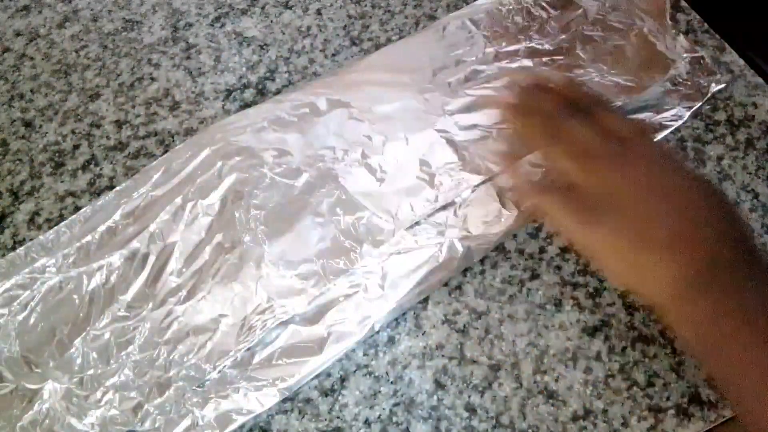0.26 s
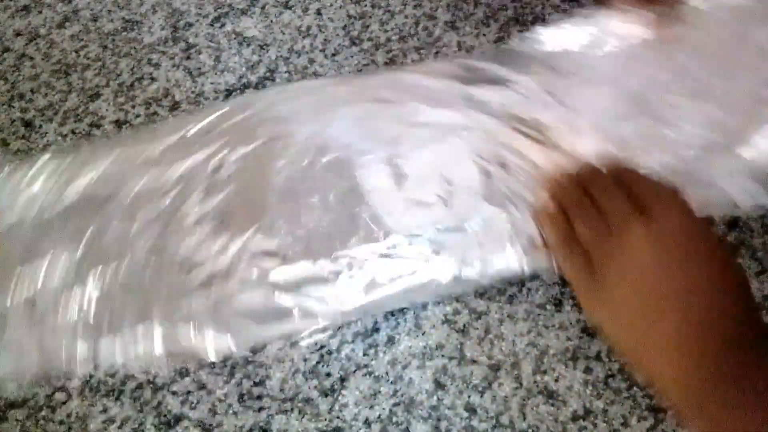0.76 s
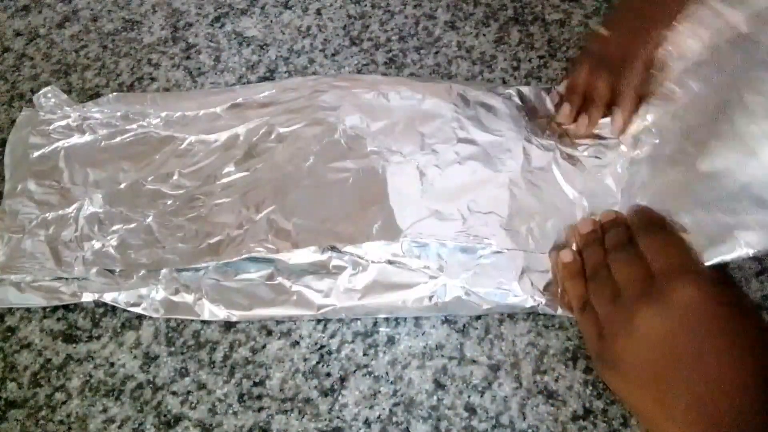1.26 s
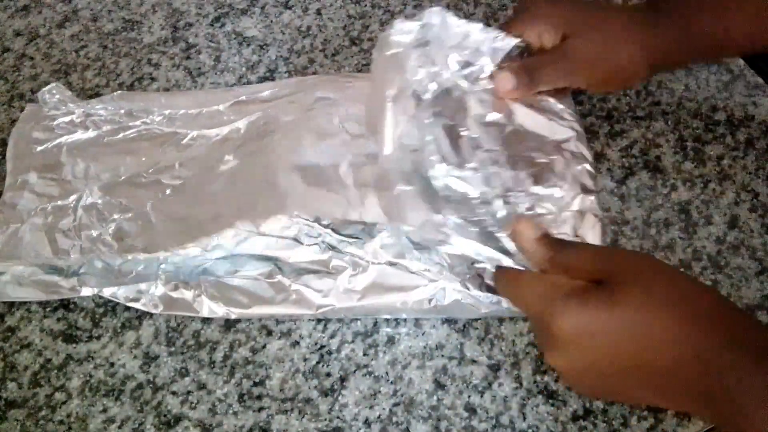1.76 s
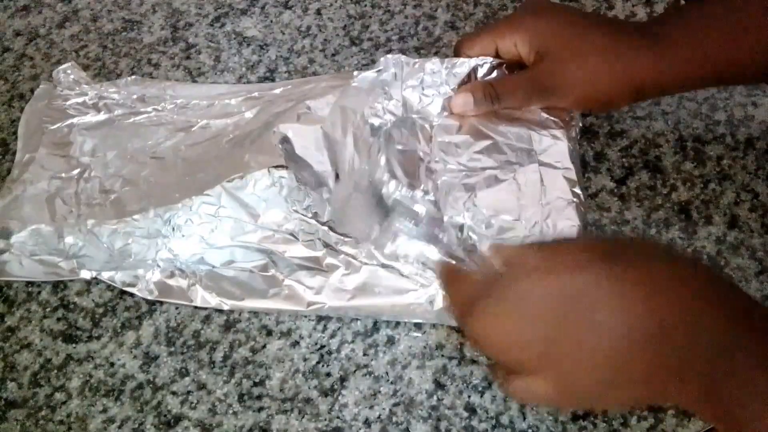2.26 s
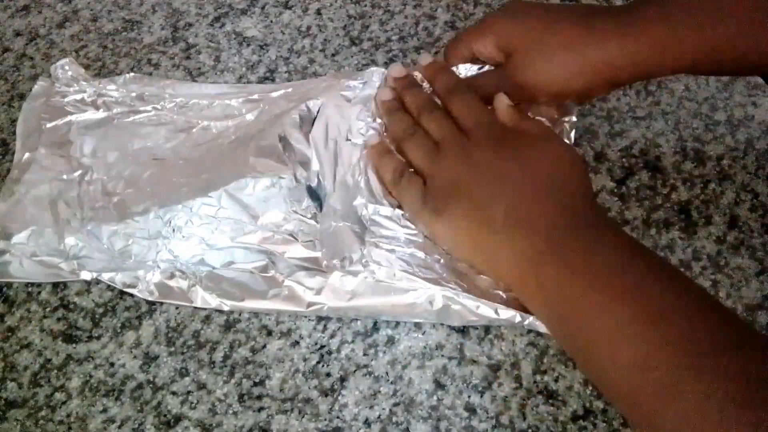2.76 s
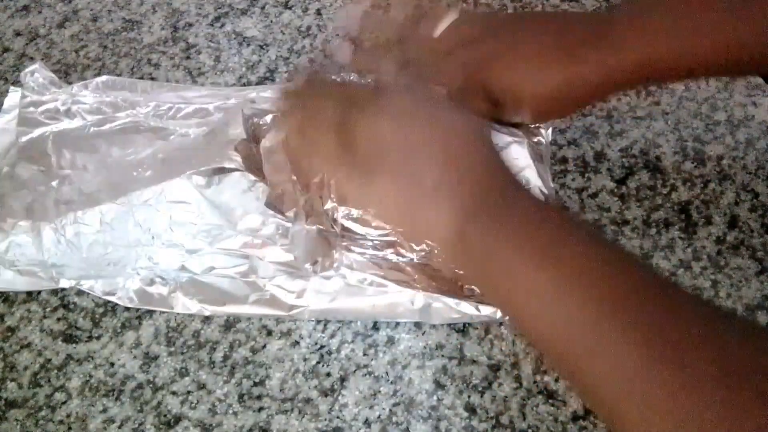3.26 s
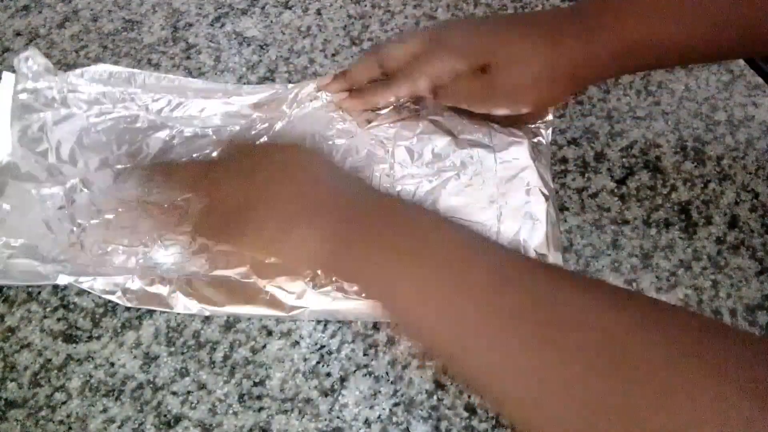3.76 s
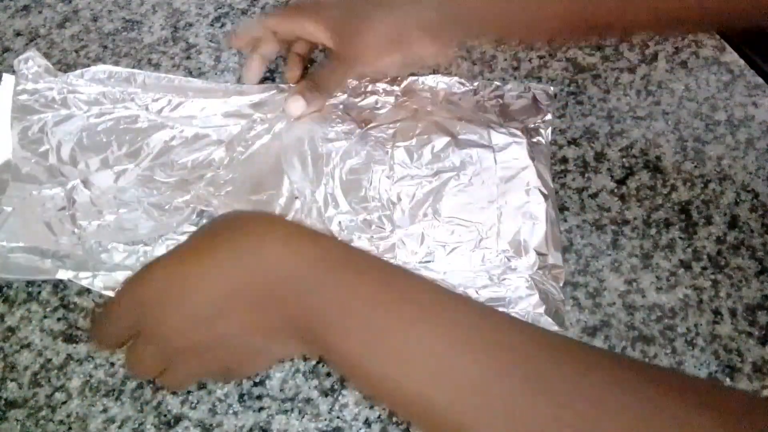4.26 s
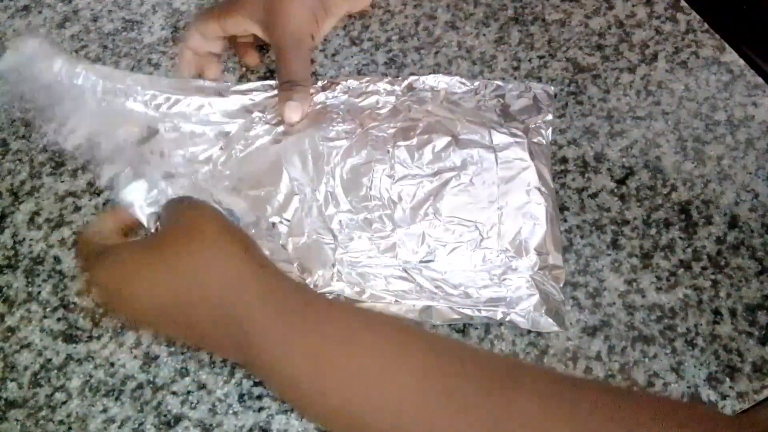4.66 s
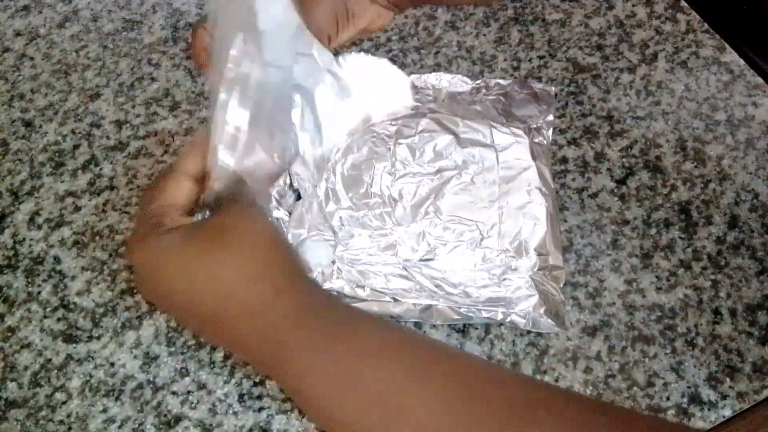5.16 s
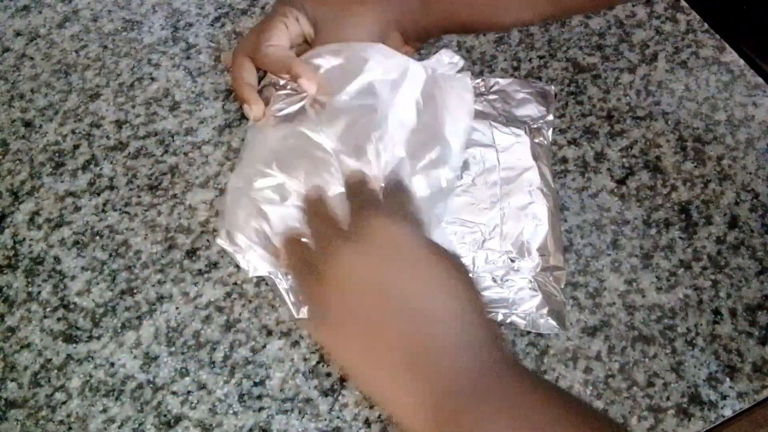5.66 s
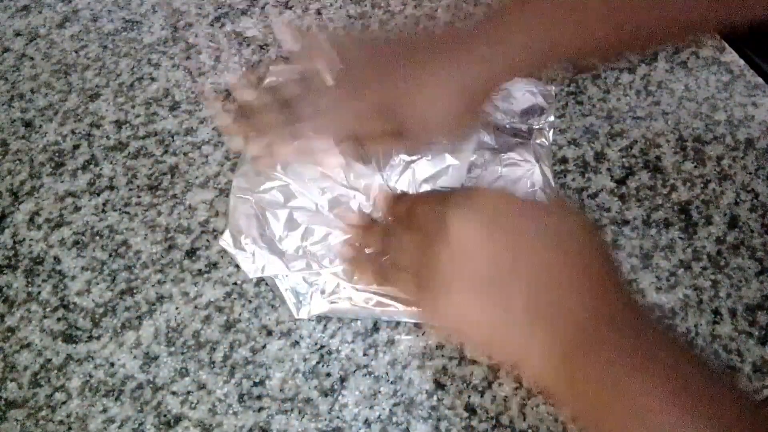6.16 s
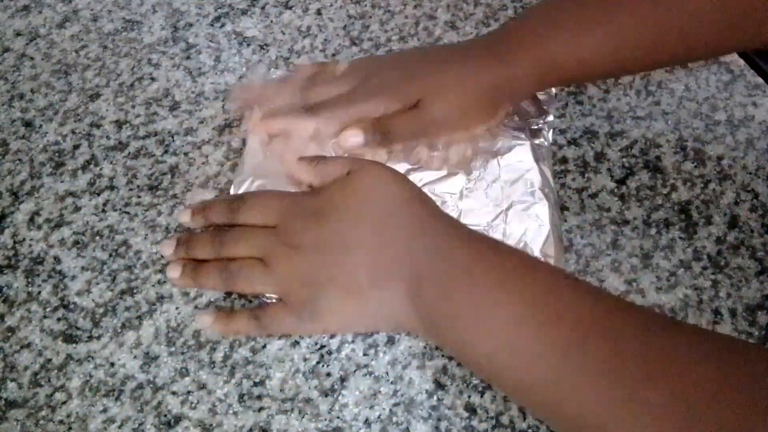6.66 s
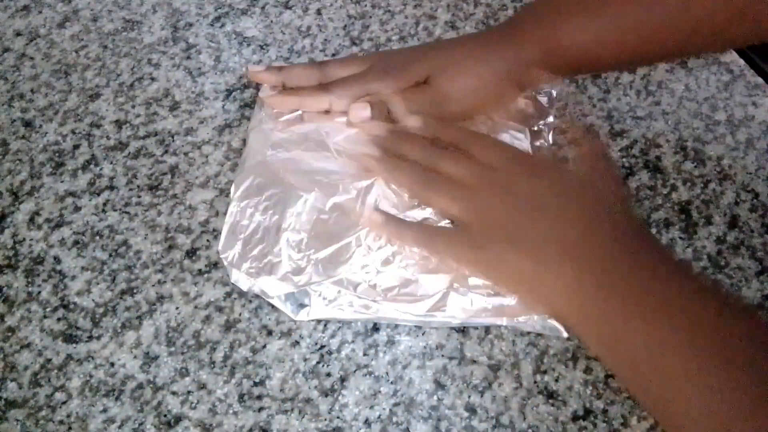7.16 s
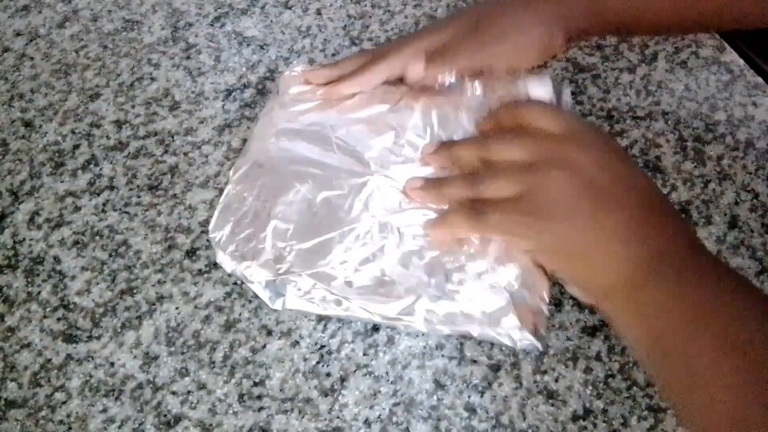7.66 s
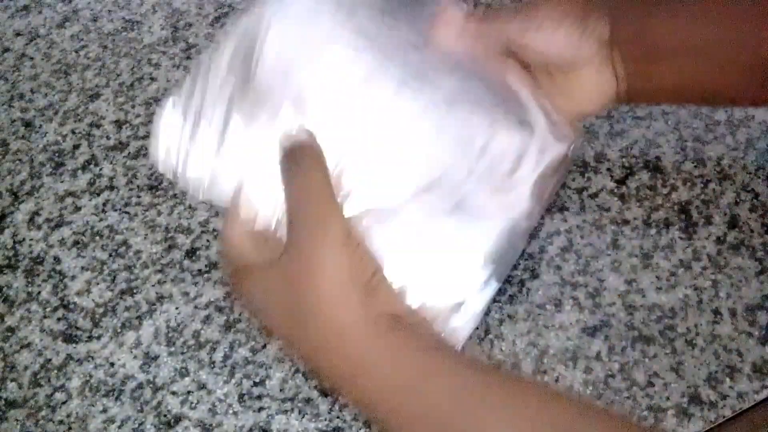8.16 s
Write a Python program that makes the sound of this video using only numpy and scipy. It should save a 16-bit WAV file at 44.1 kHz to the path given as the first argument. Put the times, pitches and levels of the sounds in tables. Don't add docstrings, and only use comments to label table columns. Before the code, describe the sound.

A close microphone in a quiet, hard-walled kitchen catches thin foil and plastic film crackling on a stone worktop, bright and sizzling with almost no bass. It opens at once with a loud crunch and palm pat, then bursts at 0.5 and 0.7 s. Around 1.1 s there are scattered ticks, then a strong fold swells near 1.35 s and a fuller, lower crunch comes at 1.8 s. Gentler crinkling follows to 2.7 s, then sharp strokes at 2.8-3.8 s with small hollow knocks. Sparse crackles at 4-4.6 s build to busy rustling and flapping from 4.8 to 5.8 s. About 6 s it thins to ticks, then snappy pressing at 6.3-6.7 s. Firm pats at 7.0 and 7.3 s thump the slab with a soft low hum. Rustling strokes continue, ending in dense crisp snaps from 8.2 to 8.4 s.

```python
import sys
import numpy as np
from scipy import signal
from scipy.fft import rfft, irfft
from scipy.io import wavfile
from scipy.ndimage import uniform_filter1d, minimum_filter1d

SR = 44100
rng = np.random.default_rng(int(sys.argv[2]) if len(sys.argv) > 2 else 0)


def voltage_ratio(decibels):
    exponent = np.asarray(decibels, float) / 20
    return 10 ** exponent


def transcribe(signal):
    frames = np.atleast_2d(signal).T
    limited = np.clip(frames, -1, 1)
    pcm = np.round(limited * 32767).astype(np.int16)
    wavfile.write(sys.argv[1], SR, pcm)


N = 371322


def unit(x):
    return x / np.sqrt(np.mean(x ** 2))


def colour(x, points):
    hz, db = np.transpose(points)
    size = 4096
    grid = np.maximum(np.arange(size // 2 + 1) * SR / size, 1)
    gain_db = np.interp(np.log(grid), np.log(hz), db)
    cepstrum = irfft(np.log(voltage_ratio(gain_db)))
    cepstrum[1:size // 2] *= 2
    cepstrum[size // 2 + 1:] = 0
    return signal.fftconvolve(x, irfft(np.exp(rfft(cepstrum))))[:N]


def fade(t60, length):
    return np.exp(-np.log(1000) * np.arange(length) / (max(t60, .004) * SR))


def scatter(rate, spread_db):
    when, size = rng.random(N), rng.exponential(size=N)
    return (when < rate / SR) * voltage_ratio(spread_db * np.minimum(size, 3))


# (frequency [Hz], level [dB per Hz])
HUSH = [(20, -33), (60, -8), (150, -2), (480, 3.5), (1400, -11), (2200, 4), (6500, -4), (8200, -9),
        (15800, -18)]


def kitchen_hush():
    return unit(colour(rng.standard_normal(N), HUSH)) * voltage_ratio(-49.5)


# (time of peak [s], effort [dB], build-up [s], let-go [s])
BENDS = [(.118, -12.5, 0.098, 0.13), (.676, -13, 0.12, 0.33), (.9, -16, 0.88, 0.26),
         (1.348, -10, 0.19, 0.18), (1.6, -18.5, 0.9, 0.11), (1.736, -18.5, 0.072, .1), (2.18, -17, 1, 0.12),
         (2.357, -25, 0.065, 0.05), (2.594, -19.5, .12, 0.66), (2.943, -13.5, 0.076, 0.18),
         (3.185, -17, 0.67, 0.14), (3.299, -12, 0.088, .1), (3.44, -21.5, 0.1, 0.079),
         (3.799, -16, .4, 0.16), (4.101, -18.5, 0.16, 0.23), (4.56, -20.5, 0.16, 1), (4.8, -17.5, 0.7, 1),
         (4.923, -14, 0.12, 0.18), (5.123, -16.5, 0.24, 0.21), (5.272, -15, .13, 0.12),
         (5.404, -13, 0.1, .35), (5.619, -16.5, 0.1, 0.16), (5.773, -12, 0.18, 0.2),
         (5.923, -23.5, 0.25, 0.42), (6.878, -23, 1, 0.1), (7.188, -22, 0.25, 0.059),
         (7.565, -19, 0.15, 0.2), (7.788, -16, 0.25, 0.11), (8.012, -17.5, 0.71, 0.12),
         (8.41, -14.5, 0.36, .3)]
# (time [s], effort [dB], build-up [s], let-go [s], extra push on large panels [dB])
PRESSES = [(.018, -25.5, 0.083, 0.055, -3), (.046, -9.5, 0.0069, 0.059, 1), (.348, -24, 0.026, 0.036, -3),
           (0.506, -11.5, 0.053, 0.13, -3.5), (1.2, -24, 0.0063, .2, -12), (1.83, -18, 0.015, 1, 0.5),
           (2.76, -11.5, 0.038, 0.15, -0.2), (3.602, -14, 0.044, 0.37, 2.5), (4.02, -16, 0.021, 0.24, 3),
           (4.37, -21, .015, .13, 1), (5.225, -27, .02, 0.055, 2), (6.297, -13, 0.051, 0.068, 0.5),
           (6.531, -15, 0.056, 0.55, 1.5), (7.028, -8, 0.0086, 0.077, 2.5), (7.28, -14.5, 0.013, 0.12, 3),
           (8.25, -24, 0.045, 0.35, 1)]
# (time [s], slackness [dB])
SLACK = [(0, -1), (1.3, -1.5), (1.7, 4), (2.2, -0.9), (2.5, -0.7), (3.1, 0.7), (3.7, -0.8), (4.3, -0.1),
         (4.6, -1.5), (4.9, -3.5), (5.3, -2.7), (5.8, -3), (6.3, 0.1), (6.62, -6.5), (6.8, -1.3),
         (7.3, 0.5), (7.9, 0.3), (8.42, 0.5)]


def handling():
    t = np.arange(0, N + 32, 32) / SR
    rest_db, stroke_bend = -48, 1.138
    lift_db, lift_s, land_s = -5, 0.041, 1.5

    def stroke_power(s, db, build, let_go):
        away = np.where(t < s, (s - t) / max(build, .003), (t - s) / max(let_go, .003))
        return voltage_ratio(db - 20 * away ** stroke_bend) ** 2

    lift = sum(np.exp(-((t - s + land_s * build) / lift_s) ** 2) for s, _, build, *_ in PRESSES)
    bending = voltage_ratio(rest_db) ** 2 + sum(stroke_power(*row) for row in BENDS)
    power = push = bending * voltage_ratio(lift_db * lift) ** 2
    for *row, extra_db in PRESSES:
        press = stroke_power(*row) * voltage_ratio(lift_db * lift * (t > row[0])) ** 2
        power = power + press
        push = push + press * voltage_ratio(extra_db) ** 2

    facet_db = 10 * np.log10(power)
    slack_db = np.interp(t, *np.transpose(SLACK))
    fold_db = -12 - 0.088 * (facet_db + 15.5) + slack_db
    panel_db = -40 + 0.85 * (facet_db + 19.5) + 10 * np.log10(push / power) + 0.2 * slack_db
    return (np.interp(np.arange(N) / SR, t, db) for db in (facet_db, fold_db, panel_db, slack_db))


def avalanches(rate, spread_db, t60):
    swells = signal.lfilter([1], [1, -fade(t60, 2)[1]], scatter(rate, spread_db))
    return swells / np.sqrt(uniform_filter1d(swells ** 2, SR // 12) + 1e-6)


# (frequency [Hz], level [dB per Hz])
FOIL_COLOUR = [(71, -68), (120, -41), (272, -30.5), (533, -21.5), (963, -19.5), (1090, -16), (1210, -16.5),
               (1360, -16), (2140, -20), (3560, -13), (5350, -13), (8390, 0.5), (11200, -10.5),
               (14900, -15), (15800, -13.5)]


def through_port(x):
    return colour(x, FOIL_COLOUR)


def pops(db):
    step = fade(0.0067, 2)[1]
    flips = scatter(130, 2.9)
    shudder = signal.lfilter([1], [1, -2 * step, step ** 2], flips) * rng.standard_normal(N)
    ring = signal.iirpeak(8320, 4.1, fs=SR)

    def heard(x):
        return through_port(signal.lfilter(*ring, x) + 0.44 * x)

    return heard(shudder * voltage_ratio(db)) / np.std(heard(shudder))


# (time [s], peak level [dB])
CRUNCHES = [(.044, -7), (.9419, -17), (1.4512, -12.5), (1.608, -18), (1.6612, -14), (1.8037, -7),
            (2.4422, -15.5), (2.473, -15), (2.5106, -15.5), (2.5765, -12.5), (2.634, -15), (2.6517, -14.5),
            (3.576, -12), (4.009, -12), (4.177, -13.5), (4.2452, -13.5), (4.361, -11.5), (4.9059, -14),
            (5.9862, -11.5), (6.682, -13.5), (6.7074, -10), (6.8246, -16), (7.0262, -8.5), (7.3504, -20),
            (7.2745, -10.5), (7.289, -10), (7.6794, -15), (7.916, -12), (8.2466, -12), (8.291, -12.5)]
# (time [s], peak level [dB])
TICKS = [(.3383, -11.5), (.4398, -22), (6.0375, -15), (1.0703, -25), (1.0863, -10), (1.12, -10.5),
         (1.1475, -15.5), (1.1947, -15.5), (1.7096, -12), (2.2776, -20), (2.293, -15.5), (2.3377, -14.5),
         (2.3914, -14.5), (2.4055, -15), (3.5084, -16), (3.9163, -16), (3.981, -14), (4.2117, -14),
         (4.291, -17), (4.46, -16.5), (5.931, -13), (6.027, -14), (6.0912, -16.5), (6.108, -16),
         (6.192, -14), (6.2335, -17.5), (6.0785, -18.5), (8.1313, -13.5), (8.1828, -16), (8.157, -15.5)]
# (time [s], peak level [dB])
SNAPS = [(.478, -12), (.566, -10), (.9143, -14.5), (1.6394, -12), (1.8493, -9.5), (2.7286, -10),
         (2.824, -12.5), (3.0365, -11.5), (3.169, -11), (3.3653, -11.5), (4.115, -13), (4.524, -11),
         (4.5723, -14), (4.6855, -12), (4.9657, -16), (5.219, -11), (5.255, -11), (5.614, -10),
         (5.6295, -14), (6.275, -9.5), (6.505, -15.5), (6.5295, -9), (6.605, -10.5), (6.6515, -11),
         (6.6655, -9), (8.2172, -7), (8.2717, -8.5), (8.2816, -7), (8.3054, -12.5), (8.3622, -10)]


def crack_activity(share_db, folds):
    activity, t = np.zeros(N + SR), np.arange(SR // 8) / SR

    def add(cracks, fold_db, run_s, build_s):
        for s, db in cracks:
            start, run = int(s * SR), run_s * voltage_ratio(1.25 * (db + 10))
            shape = np.exp(-t / run) * np.minimum(t / build_s, 1)
            activity[start:start + len(t)] += voltage_ratio(db + share_db + folds * fold_db) * shape

    add(CRUNCHES, fold_db=-10, run_s=0.0057, build_s=0.0016)
    add(TICKS, fold_db=-17, run_s=0.0053, build_s=0.0014)
    add(SNAPS, fold_db=-20, run_s=0.0066, build_s=0.0023)
    return activity[:N]


CREASES = {"facet": (5500, 19000, 6500, 0.27, 1.36), "fold": (2100, 5500, 5000, 0.39, 0.45),
           "panel": (150, 2102, 1488, .5, -22)}


def foil():
    facet_db, fold_db, panel_db, slack_db = handling()
    effort = {"facet": voltage_ratio(facet_db), "fold": voltage_ratio(facet_db + fold_db), "panel": voltage_ratio(panel_db)}
    shared = .4 * avalanches(120, 2.8, 0.28) + 0.27 * avalanches(500, 3.1, 0.016)
    gaps = (shared / 0.76) ** np.clip(0.031 * (-15 - facet_db), 0, 2)
    stutter = 0.63 + .5 * avalanches(600, 7.8, 0.013)
    rings_an_octave = 2.5
    narrowing, dimming = 0.98, .15
    out = 0
    for size, (lo_hz, hi_hz, rate, unrest, share_db) in CREASES.items():
        cracks = crack_activity(share_db, folds=size == "fold")
        bands = round(rings_an_octave * np.log2(hi_hz / lo_hz))
        edges = np.geomspace(lo_hz, hi_hz, bands + 1)
        steady, handled = 0, 0
        for band in zip(edges, edges[1:]):
            ring = signal.butter(2, band, "band", fs=SR, output="sos")
            clicks = scatter(rate, 2.77) * np.sign(rng.standard_normal(N))
            swells = shared + unrest * avalanches(120, 3.8, 0.049)
            activity = effort[size] * gaps * swells + cracks * stutter
            if size == "facet":
                off = np.log2(np.sqrt(band[0] * band[1]) / 8300)
                tilt_db = narrowing * slack_db * abs(off) + dimming * (facet_db + 18) * max(off, 0)
                activity = activity * voltage_ratio(tilt_db)
            steady = steady + signal.sosfilt(ring, clicks)
            handled = handled + signal.sosfilt(ring, clicks * activity)
        out = out + through_port(handled) / np.std(through_port(steady))
    return out + pops(facet_db - 7 - 0.71 * slack_db)


# (time [s], peak level [dB], ring [Hz])
KNOCKS = [(.0427, -18.5, 1270), (.5036, -31, 990), (.6552, -26, 1610), (.8085, -25, 1460),
          (5.272, -30.5, 620), (1.851, -34, 1090), (2.1866, -30, 1300), (2.9277, -31, 1050),
          (3.1652, -30, 1630), (3.299, -22, 1340), (3.5715, -28.5, 1350), (3.618, -25.5, 1370),
          (3.6696, -26, 670), (4.0085, -24.5, 1070), (4.1133, -24.5, 1360), (5.6607, -26.5, 1370),
          (4.8323, -27.5, 1340), (5.6047, -30, 1370), (5.772, -21.5, 1370), (5.8367, -25.5, 1480),
          (6.2759, -30, 1050), (6.525, -29, 1100), (7.0235, -19, 890), (7.2867, -22, 1010),
          (7.3067, -27, 1380), (7.3493, -32, 1344), (7.5266, -27.5, 1430), (7.6157, -27.5, 1600),
          (7.6836, -21, 1420), (7.9507, -29, 810)]


def knocks():
    t, out = np.arange(SR // 10) / SR, np.zeros(N + SR)
    modes = ((1.02, 1), (0.657, 0.18), (1.23, 0.33))
    for s, db, hz in KNOCKS:
        ring = sum(gain * np.sin(2 * np.pi * hz * ratio * t) for ratio, gain in modes) * fade(0.017, len(t))
        onset = np.minimum(t / 0.0011, 1) ** 3
        jolts = rng.standard_normal(len(t)) ** 3 * fade(0.022, len(t)) * onset
        pop = signal.fftconvolve(ring, jolts)[:len(t)]
        start = int(s * SR)
        out[start:start + len(t)] += voltage_ratio(db + 7.0) * pop / np.max(np.abs(pop))
    return signal.sosfilt(signal.butter(4, 300, "high", fs=SR, output="sos"), out[:N])


# (time [s], peak level [dB])
PATS = [
    (0.045, -49),
    (4.01, -63),
    (6.587, -60),
    (7.027, -43),
    (7.277, -42.5),
    (8.29, -58),
]
# (frequency [Hz], t60 [s], level [dB])
SLAB = [(77, .22, 3.5), (108, .12, -3)]


def pats():
    t, out = np.arange(SR // 2) / SR, np.zeros(N + SR)
    hum = sum(voltage_ratio(db) * np.sin(2 * np.pi * hz * t) * fade(t60, len(t)) for hz, t60, db in SLAB)
    push = np.minimum(t / 0.0059, 1)
    for s, db in PATS:
        start = int(s * SR)
        out[start:start + len(t)] += voltage_ratio(db) * hum * push
    return out[:N]


def kitchen(x):
    t60_s, dull_hz, level_db = 0.58, 7350, -15
    length = SR // 2
    build = np.minimum(np.arange(length) / (0.004 * SR), 1)
    tail = rng.standard_normal(length) * fade(t60_s, length) * build
    tail = signal.lfilter(*signal.butter(1, dull_hz, fs=SR), tail)
    return signal.fftconvolve(x, tail / np.sqrt(np.sum(tail ** 2)))[:N] * voltage_ratio(level_db)


def scene():
    near = foil() + knocks() + pats()
    return (near + kitchen(near) + kitchen_hush())[None]


def band_limit(x):
    return signal.sosfilt(signal.butter(12, 17010, fs=SR, output="sos"), x)


def record(dry):
    needed = np.minimum(1.21 / (np.abs(dry) + 1e-9), 1)
    gain = uniform_filter1d(minimum_filter1d(needed, size=256), size=256)
    top_cut = signal.ellip(10, .2, 70, 15900, fs=SR, output="sos")
    mix = np.clip(signal.sosfilt(top_cut, dry * gain), -1, 1)
    return band_limit(mix)


dry = scene()
out = record(dry)
transcribe(out)
```